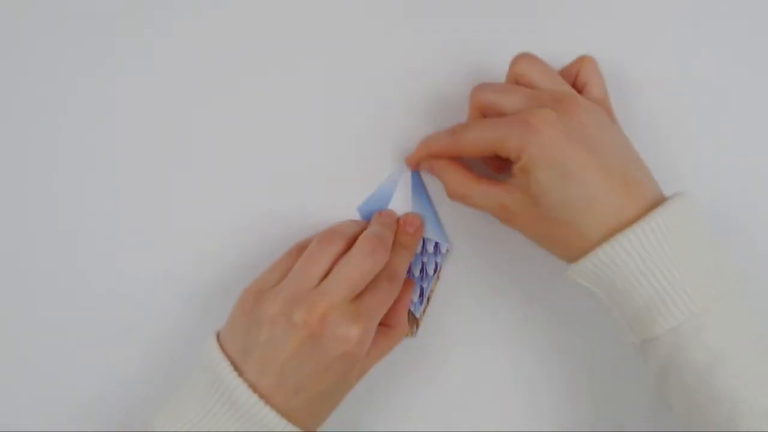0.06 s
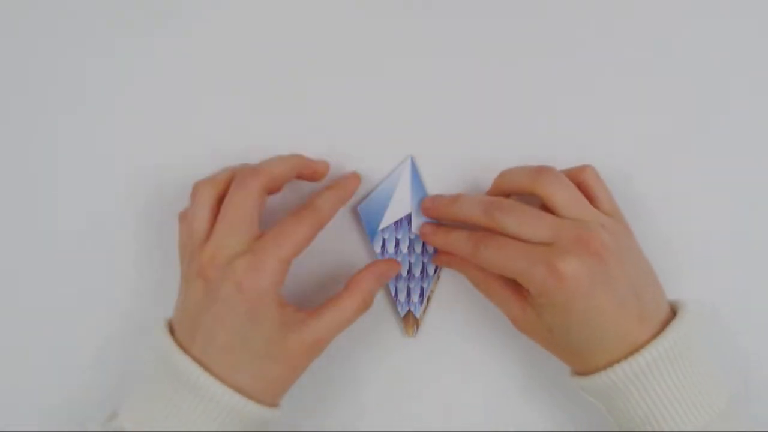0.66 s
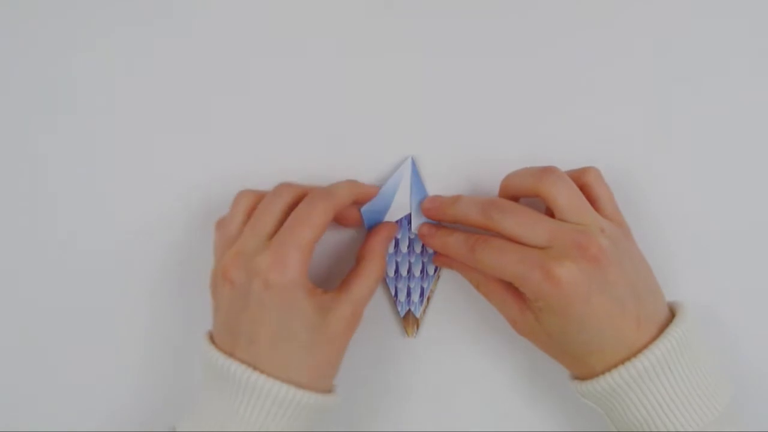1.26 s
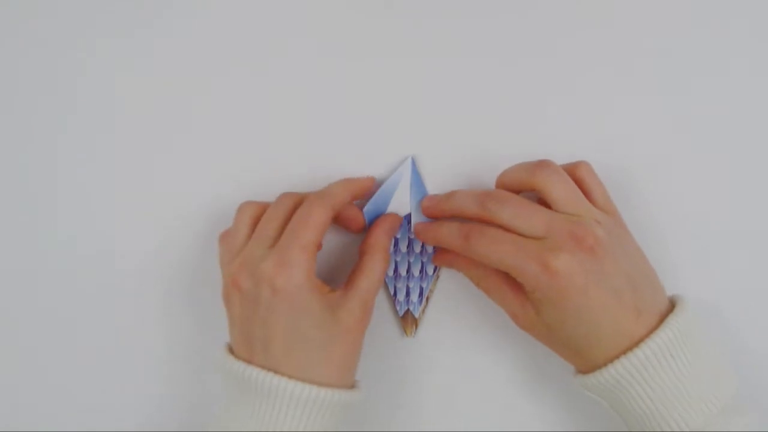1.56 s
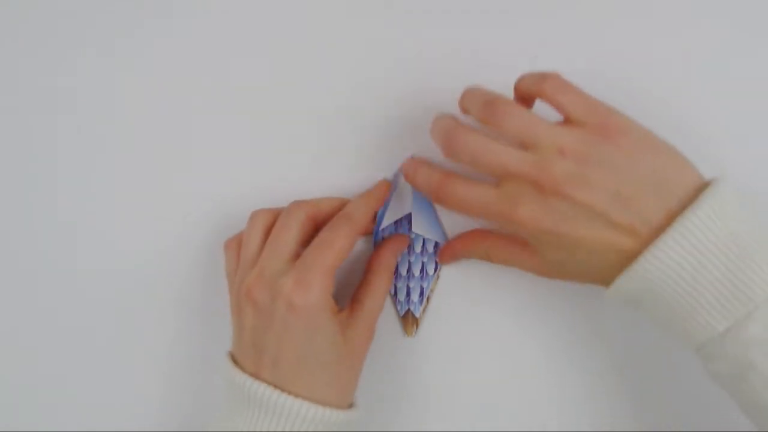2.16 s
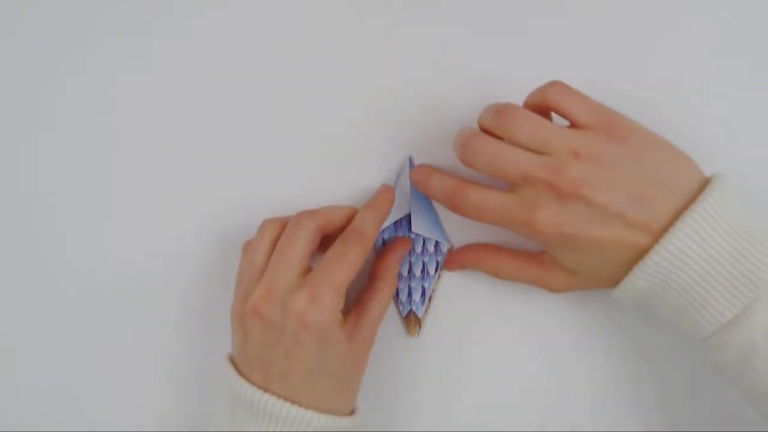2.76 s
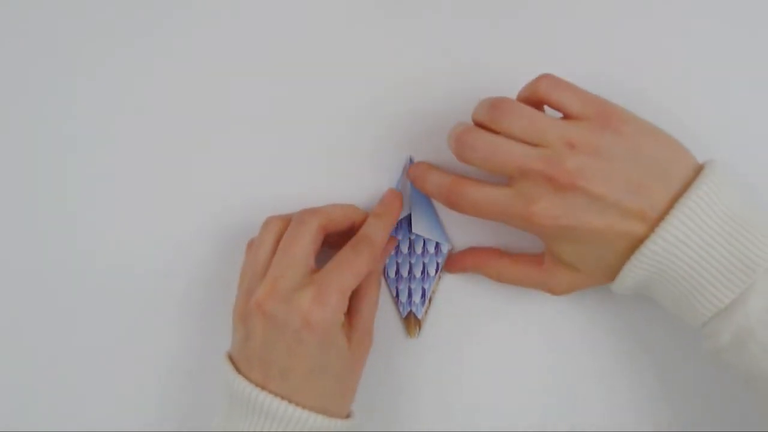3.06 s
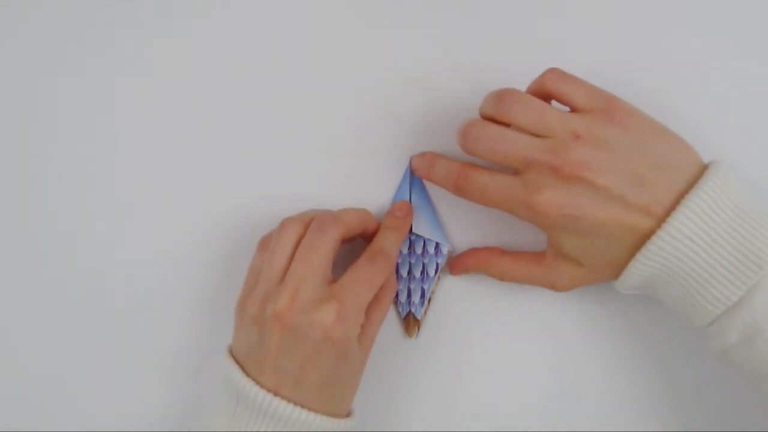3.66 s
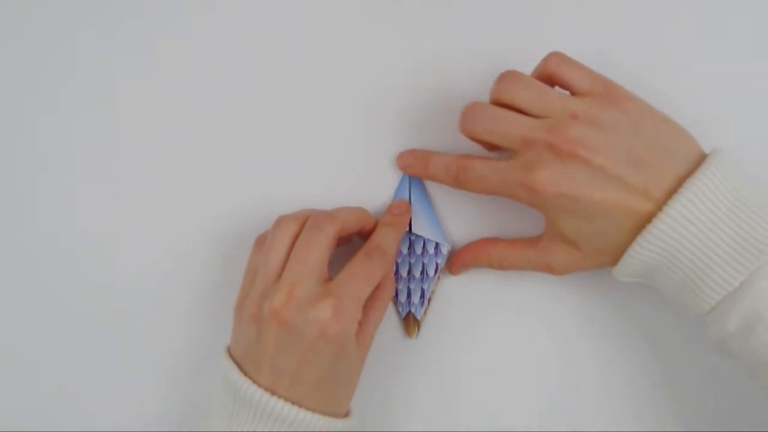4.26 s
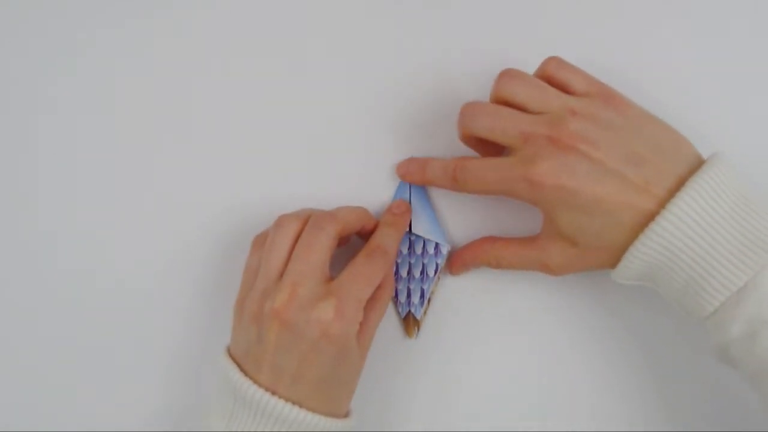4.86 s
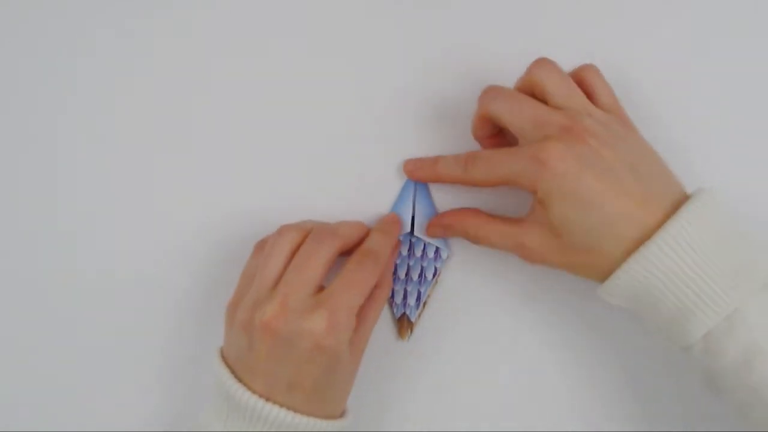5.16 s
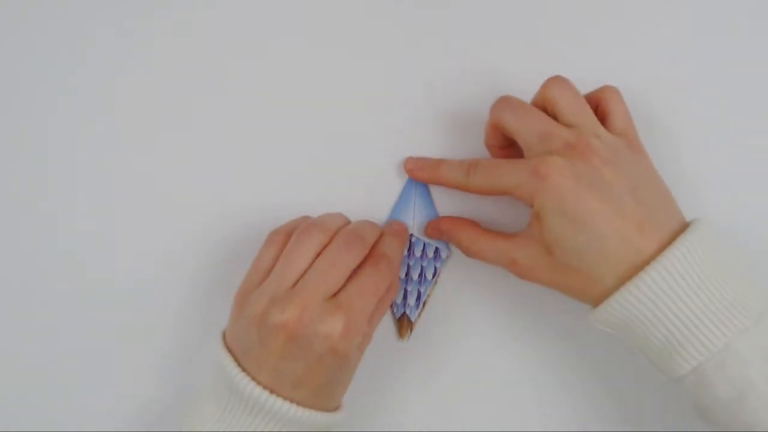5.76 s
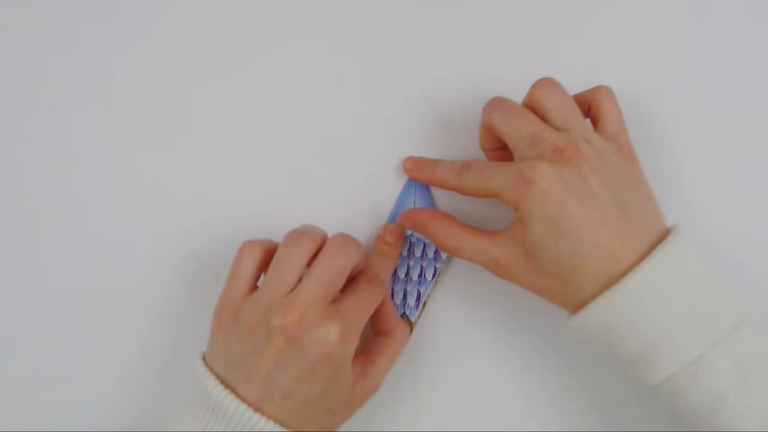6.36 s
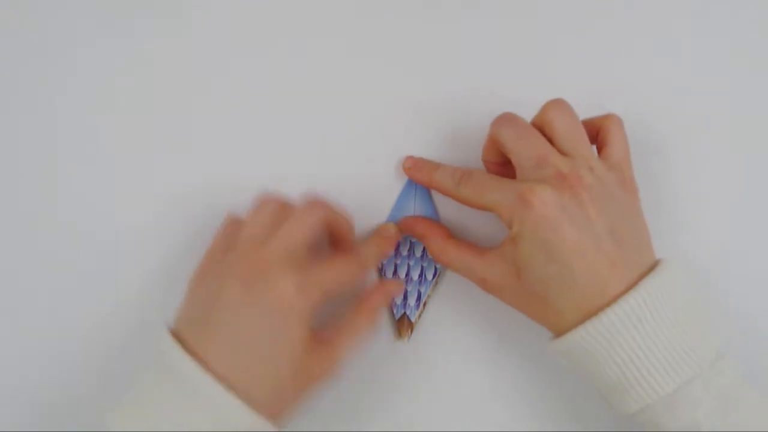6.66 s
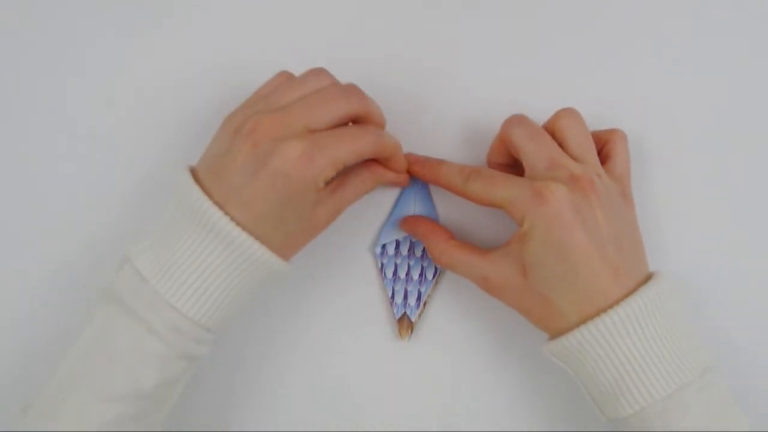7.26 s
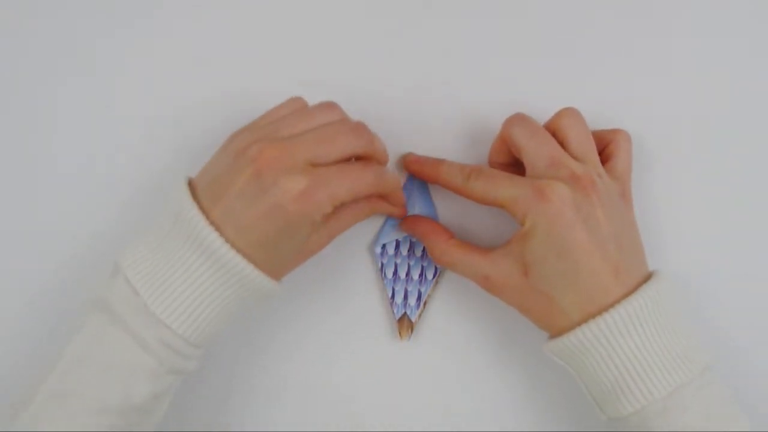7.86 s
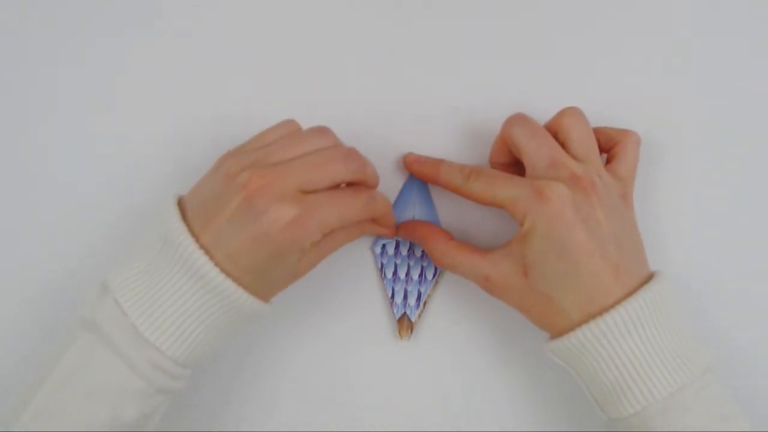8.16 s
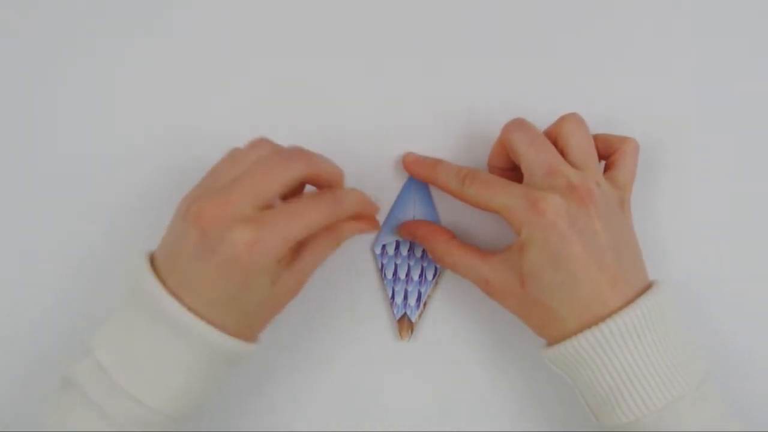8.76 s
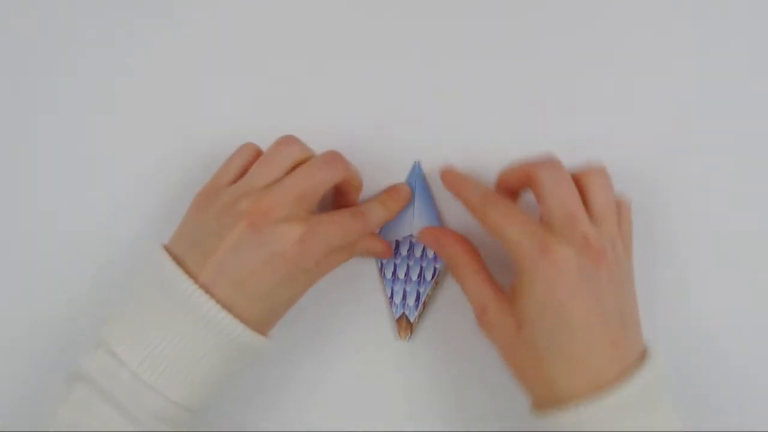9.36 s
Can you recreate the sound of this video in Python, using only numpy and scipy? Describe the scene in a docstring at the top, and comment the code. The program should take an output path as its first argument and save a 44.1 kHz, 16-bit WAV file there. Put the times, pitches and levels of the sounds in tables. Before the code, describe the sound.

Close paper folding in a quiet room: fingertips slide and press, creases crackle and snap, and the tabletop thuds softly.

```python
"""A small paper model folded on a table in a quiet, dry room, one microphone close to the fingers.
It opens with a hard tap and fingertips thumping the tabletop. Skin then slides on paper with a grainy
hiss, folds buckle in crisp crackles and the table rumbles under the hands. At 5.4 s a stiff fold snaps
through loudly; more creasing and thumps follow, then a second snap with a tap at 8.6 s and a few last
strokes. Room tone and a thin electrical whine lie underneath all the way."""
import sys
import numpy as np
from scipy import signal
from scipy.fft import rfft, irfft, next_fast_len
from scipy.io import wavfile

SR = 44100
rng = np.random.default_rng(int(sys.argv[2]) if len(sys.argv) > 2 else 0)


def output_pcm(signal):
    """Save a mono or channel-first signal as 16-bit PCM at the path in sys.argv[1].

    Samples are clipped to [-1, 1] before scaling.
    """
    pcm = np.clip(np.atleast_2d(signal).T, -1, 1) * 32767
    wavfile.write(sys.argv[1], SR, np.round(pcm).astype(np.int16))


N = 414981
TIME = np.arange(N) / SR
CRACK_TIME, CRACK_ONSET = np.arange(1024) / SR, int(.004 * SR)  # a crack's first 4 ms set its level

# Levels in the tables stand before the gains in the functions.
# fingers over paper: t/s, length/s, fastest point/share of length, hiss/dB, body/dB and sheen/dB re hiss
FINGER_STROKES = [(0.0, 0.13, 0.52, -53, -4.5, -12), (0.092, .11, 0.34, -48.5, -2.5, -10),
                  (0.425, 0.092, 0.66, -56.5, -1, -14), (0.494, 0.05, .55, -48, -4.5, -9),
                  (0.538, .075, 0.44, -54.5, -1, -12), (0.57, .2, 0.37, -60, -5, -13),
                  (0.7, 0.41, 0.22, -56, 1, -15), (0.94, .27, 0.69, -52.5, 0, -21),
                  (1.216, 0.05, .3, -49.5, -3, -16), (1.355, 0.044, .3, -50, 5.5, -13),
                  (1.397, 0.12, .4, -60, 0, -16), (1.493, 0.17, .35, -54.5, 2, -17),
                  (1.67, .06, 0.17, -45, -5, -12), (1.728, 0.17, 0.41, -48.5, -5.5, -8),
                  (1.899, 0.12, 0.42, -50.5, -3, -8), (2.1, 0.13, 0.42, -48, -5.5, -8),
                  (2.215, 0.16, 0.62, -52, -3, -6), (2.527, 0.076, .35, -54.5, 0, -12),
                  (2.445, 0.77, .5, -67, 3, -12), (2.925, .13, .55, -54.5, -4, -11),
                  (3.02, .15, .4, -62, -3, -14), (3.087, .028, .5, -54, -5, -14),
                  (3.165, 0.053, .45, -56, -9, -12), (3.277, 0.47, 0.23, -61, 0, -22),
                  (3.695, 0.072, .65, -52.5, -10, -9), (4.35, .035, .2, -53, -7, -8),
                  (4.361, 0.086, .42, -46.5, -6.5, -10), (4.956, 0.16, 0.19, -48.5, -0.5, -13),
                  (5.149, 0.057, .3, -55.5, -1.5, -16), (5.28, 0.15, .5, -59, 3, -15),
                  (6.06, 0.19, 0.51, -55.5, -4, -20), (6.21, 0.042, .45, -52, -1, -14),
                  (6.45, 0.046, .6, -54.5, -2, -15), (6.7, 0.036, .25, -54, -9, -16),
                  (7.153, .08, .35, -50, -5, -21), (7.167, .022, .5, -40.5, -8, -22),
                  (7.33, 0.022, .5, -58, -5, -19), (7.455, 0.037, .4, -55, -4, -22),
                  (7.557, 0.35, 0.57, -61.5, 1.5, -18), (7.703, 0.15, .45, -47.5, -18, -23),
                  (7.86, 0.083, 0.52, -53.5, -3.5, -15), (7.98, .29, 0.42, -58, -1, -12),
                  (8.36, 0.3, 0.5, -65, -1, -10), (8.804, 0.024, .25, -45.5, -20, -2),
                  (8.941, .035, .5, -54.5, -3, -15), (9.205, 0.085, 0.45, -46, -12, -8),
                  (9.314, 0.11, 0.46, -53.5, -2.5, -11)]
# creases rubbed against the table: t/s, length/s, level/dB
CREASE_RUBS = [(0.09, 0.11, -51.5), (1.233, 0.075, -55.5), (1.583, 0.16, -62.5), (4.955, 0.1, -56),
               (5.28, 0.21, -59.5), (8.111, .07, -55.5), (8.308, .14, -52.5), (9.33, .09, -59)]
# friction spectra of the fibres, their top sheen, the sheet's body and a dull rub: f/Hz, level/dB
HISS_SPECTRUM = [(3000, -21.5), (5500, -8.5), (7000, -5.5), (8500, -0.5), (9900, 1), (11000, -6),
                 (12200, -13.5), (16000, -34)]
SHEEN_SPECTRUM = [(8000, -25), (10500, 2), (11800, -4), (13200, -8), (16000, -23)]
BODY_SPECTRUM = [(900, -23), (2150, -6.5), (2800, 0), (4200, -0.5), (5700, -3.5), (7500, -12), (11000, -41)]
RUB_SPECTRUM = [(250, -19), (500, 6), (1100, 1.5), (2000, -4), (4000, -25)]
# folds buckling: t/s, level/dB, flap ring/Hz, decay/s, upper edge/Hz
FOLD_CRACKLES = [(0.1095, -29.5, 3220, .0031, 11600), (0.166, -40.5, 9100, .002, 11600),
                 (0.454, -44.5, 9860, 0.00053, 11600), (1.2054, -47, 3640, .003, 11000),
                 (1.2554, -42.5, 6200, .0028, 11700), (1.366, -45, 3920, .0034, 11600),
                 (1.6149, -37.5, 2400, .0014, 8500), (1.675, -41.5, 4800, .003, 11000),
                 (1.7494, -43, 9950, 0.0035, 12000), (1.9093, -46.5, 5000, .003, 10800),
                 (2.0059, -46, 4080, .0011, 10000), (2.5357, -48, 10420, 0.0042, 12500),
                 (3.0483, -46, 3700, .003, 11400), (3.1, -48, 8700, .003, 11200),
                 (3.4813, -49, 7500, .0022, 12000), (3.528, -48.5, 4200, .0022, 10500),
                 (3.5704, -47, 7500, .002, 11000), (3.683, -47, 3500, 0.0019, 7460),
                 (3.812, -40.5, 9300, 0.0013, 11000), (3.924, -54, 2800, 0.0017, 10000),
                 (4.6714, -38, 8200, 0.0013, 11700), (4.9117, -47.5, 3300, .001, 12000),
                 (4.9757, -44.5, 8000, .0033, 11600), (5.286, -45, 5210, .0016, 12200),
                 (5.333, -44, 7150, .002, 11000), (5.3646, -42.5, 6000, .002, 10500),
                 (5.462, -40.5, 2670, 0.0016, 12400), (5.4787, -49, 3140, .0005, 10000),
                 (5.7775, -45, 2200, 0.0014, 9500), (5.8691, -38, 2200, 0.0014, 11000),
                 (6.485, -45.5, 3850, 0.0016, 10500), (6.6435, -52, 8790, 0.004, 11000),
                 (6.708, -49.5, 9860, 0.0042, 11400), (6.955, -38, 8160, 0.0011, 10700),
                 (7.1305, -43, 3100, 0.0022, 9800), (7.177, -37, 8300, .0045, 9800),
                 (7.4588, -48, 2970, 0.0016, 10500), (7.5301, -46.5, 3200, .0012, 11400),
                 (7.9158, -41.5, 7100, .0015, 11300), (8.137, -50, 2210, 0.0025, 11600),
                 (8.3778, -44.5, 3300, .0022, 12400), (8.807, -42.5, 3830, 0.0025, 13000),
                 (9.2485, -41, 10000, .003, 11600)]
# flurries from a squeezed crease: t/s, length/s, level/dB
CRINKLE_FLURRIES = [(3.371, .1, -56.5), (5.298, .06, -48.5), (8.31, .07, -51)]
# stiff folds snapping: t/s, level/dB, ring/Hz, width/Hz, rebound delay/s, rebound/share, tilt/(dB/octave)
FOLD_SNAPS = [(5.39, -16.5, 3540, 1300, 0.00029, 0.32, 4.0), (8.6007, -17, 4130, 1400, 0.00062, 0.3, 1)]
# short resonances of the paper model: f/Hz, width/Hz, level/dB
PAPER_MODES = [(1940, 520, -36), (3000, 1600, -12), (5600, 1000, -6.5), (7650, 1900, -9), (9200, 720, -16)]

# a nail or paper edge on the table: t/s, level/dB, tilt/(dB/octave), hollow knock/dB
HARD_TAPS = [(0.1083, -33, -1.7, -49), (8.5995, -30, -0.5, -35), (9.214, -54, -6, -45)]
# fingertips landing: t/s, level/dB, contact/s, tilt/(dB/octave)
FINGER_THUMPS = [(0.111, -35, 0.0036, 2), (0.124, -39, 0.0043, 8), (0.165, -35, .007, -1),
                 (5.332, -46, 0.0055, 8), (5.364, -41.5, 0.0054, 6), (7.137, -37, 0.0074, 0),
                 (7.177, -31, 0.0065, -6), (7.456, -40, 0.0044, -1), (8.601, -44, 0.0024, -5),
                 (8.814, -38.5, 0.0075, -5), (9.214, -45, 0.0036, 1.5)]
# hands bearing down: t/s, held/s, rumble/dB, boom/dB
HAND_PRESSES = [(0.0, .04, -61, -50), (0.48, 0.047, -53, -49), (1.53, 0.084, -53.5, -46.5),
                (1.68, 0.043, -50, -50), (1.93, 0.068, -52.5, -50), (2.11, 0.18, -57, -53),
                (2.35, .14, -60.5, -58), (3.03, 0.045, -51, -51), (3.39, 0.14, -52, -45),
                (4.35, 0.036, -56.5, -52), (4.91, 0.052, -54, -55), (4.98, 0.065, -50.5, -45),
                (5.29, 0.11, -50, -53), (5.44, 0.093, -53, -46.5), (6.03, 0.045, -50, -48),
                (6.15, .04, -50, -45), (6.48, .05, -54, -50), (6.69, 0.1, -58, -45),
                (7.13, 0.097, -50, -42), (7.44, 0.049, -49, -42.5), (7.84, 0.16, -60.5, -43.5),
                (8.32, 0.084, -49, -51), (8.82, 0.052, -53.5, -56), (8.99, .12, -60, -53),
                (9.21, .04, -43.5, -47), (9.32, 0.076, -52, -44)]
# the table stirring under resting hands: t/s, level/dB
RESTING_HANDS = [(0.0, -52), (0.23, -48), (0.76, -73), (1.42, -61), (3.51, -54), (4.27, -71), (5.5, -51),
                 (5.87, -61.5), (7.21, -53.5), (7.36, -50.5), (7.57, -55.5), (9.41, -51)]
# deep and higher modes of the tabletop: f/Hz, level/dB, t60/s
DEEP_TABLE_MODES = [(56.95, 1, 0.67), (88, -12.5, 0.27), (133, -4.5, 0.23), (178.2, -5.5, 0.36),
                    (255, -12, 0.13)]
HIGH_TABLE_MODES = [(312, -11, 0.37), (338, -0.5, 0.28), (467, -9, 0.12), (558, -3, 0.19),
                    (1140, -12, 0.18), (1440, -30, .2), (1550, -22, 0.17), (2380, -15, 0.18)]
# spectra of the table's clatter, rumble and deep boom: f/Hz, level/dB
CLATTER_SPECTRUM = [(150, -6.5), (330, 0.5), (800, -3.5), (1400, 6.5), (1800, 0.5), (2450, 7.5),
                    (3300, -3.5), (4300, -1.5), (6500, -31), (9500, -11), (12000, -19), (16000, -38)]
RUMBLE_SPECTRUM = [(55, -18), (87, 0.5), (108, -8.5), (133, 4), (157, -5), (181, -0.5), (210, -10.5),
                   (335, -10), (450, -15.5), (900, -42)]
BOOM_SPECTRUM = [(25, -38), (44, -14), (52, 18.5), (57, 23), (67, 2), (100, -54)]

# spectrum of the room tone: f/Hz, level/dB
ROOM_SPECTRUM = [(44, -46), (75, -6), (137, -8.5), (157, -7), (377, -11), (505, -16), (905, -17.5),
                 (1550, -19.5), (1740, -22.5), (2080, -20.5), (3040, -23.5), (6980, -29), (7980, -23.5),
                 (8540, -28), (16000, -41)]
# steady bands of low drone and electrical whine: f/Hz, width/Hz, level/dB
DRONE_AND_WHINE = [(24, 19, -62), (54.3, 21, -64.5), (7870, 11, -75), (7900, 200, -71.5),
                   (9220, 250, -76.5)]


def sliding(hiss_db=-1.6, sheen_db=1.0, body_db=-0.4, rub_db=0.4):
    """Close up, skin catches and slips on paper: fibres hiss, the sheet adds body, creases rub dully."""
    hiss_power, body_power, sheen_power = np.zeros((3, N))
    for s, length, crest, db, body_rel_db, sheen_rel_db in FINGER_STROKES:
        friction = undb(db) * stroke(s, length, crest)
        hiss_power += friction ** 2
        body_power += (friction * undb(body_rel_db)) ** 2
        sheen_power += (friction * undb(sheen_rel_db)) ** 2
    rub = sum(undb(db) * stroke(s, length, crest=0.48) for s, length, db in CREASE_RUBS)
    grip_db = 1.8 * walk(per_s=120) + 0.65 * walk(per_s=35)
    out = fibres(HISS_SPECTRUM, per_s=14000, spread_db=0.5) * np.sqrt(hiss_power) * undb(hiss_db)
    out += fibres(SHEEN_SPECTRUM, per_s=7500, spread_db=1.0) * np.sqrt(sheen_power) * undb(sheen_db)
    out += fibres(BODY_SPECTRUM, per_s=9000, spread_db=-0.1) * np.sqrt(body_power) * undb(body_db)
    out += fibres(RUB_SPECTRUM, per_s=3000, spread_db=2.0) * rub * undb(rub_db)
    return out * undb(grip_db)


def stroke(s, length, crest, speed_exponent=0.73):
    """Loudness of one stroke: the finger speeds up to a crest and slows to rest."""
    ramp = np.interp(TIME, [s, s + crest * length, s + length], [0, 1, 0])
    speed = np.sin(np.pi / 2 * np.maximum(ramp, 0))
    return speed ** speed_exponent


def fibres(spectrum, per_s, spread_db):
    """Dense tiny slips of paper fibres, uneven in size, merge into a grainy noise."""
    slips = (rng.random(N) < per_s / SR) * rng.standard_normal(N)
    size_db = spread_db * np.minimum(rng.exponential(size=N), 5)
    return stream(slips * undb(size_db), spectrum)


def crackles(flap_db=6, flap_width=0.28, bands_db=(-1, 0, 1.1), tick_db=-17, fall_db_per_octave=4.5):
    """A fold buckles with a jolt, shivers and rings its flap; the crack weakens away from that pitch."""
    out = np.zeros(N)
    noises = rng.standard_normal((128, len(CRACK_TIME)))
    for (s, db, hz, decay, top_hz), noise in zip(FOLD_CRACKLES + crinkles(), noises):
        start = s - .0002
        shiver = noise * np.exp(-CRACK_TIME / decay)
        shiver[0] += 5.0  # the jolt
        flap = shiver + undb(flap_db) * resonate(shiver, hz, flap_width * hz)
        # the jolt itself gives the crack a thin crisp edge
        tick = signal.lfilter(*signal.butter(2, max(top_hz, 11000), "highpass", fs=SR), shiver)
        add_crack(out, start, tick, db + tick_db - fall_db_per_octave * np.log2(top_hz / hz))
        for edges_hz, band_db in zip([(1100, 2800), (2800, 6500), (6500, top_hz)], bands_db):
            octaves_off = abs(np.log2(hz / np.mean(edges_hz)))
            band = signal.lfilter(*signal.butter(3, edges_hz, "bandpass", fs=SR), flap)
            add_crack(out, start, band, db + band_db - fall_db_per_octave * octaves_off)
    return out


def crinkles(per_s=70, ring_hz=8100, decay_s=.0017, spread_db=0.5, top_hz=11200):
    """A squeezed crease gives way in tiny, unevenly spaced crackles: rows like FOLD_CRACKLES."""
    rows = []
    for s, length, db in CRINKLE_FLURRIES:
        for k, (late, size, pitch) in enumerate(rng.uniform(-0.75, 1, (16, 3))):
            delay = (k + .5 + late / 2) / per_s
            if delay < length:
                rows.append((s + delay, db + spread_db * size, ring_hz * 2 ** (pitch / 2), decay_s, top_hz))
    return rows


def snaps(shiver_share=0.2, shiver_s=0.00094, low_hz=1500, high_hz=10500):
    """A stiff fold flips over all at once, rebounds, and rings the whole model for a moment."""
    out = np.zeros(N)
    low_cut = signal.butter(2, low_hz, "highpass", fs=SR, output="sos")
    high_cut = signal.butter(4, high_hz, fs=SR, output="sos")
    radiation = np.vstack([low_cut, high_cut])
    for s, db, hz, width_hz, delay, rebound, tilt_db in FOLD_SNAPS:
        jolt = shiver_share * rng.standard_normal(len(CRACK_TIME)) * np.exp(-CRACK_TIME / shiver_s)
        jolt[0] += 1
        jolt[int(delay * SR)] += rebound
        modes = [(hz, width_hz, 0), *PAPER_MODES]
        crack = sum(undb(level + tilt_db * np.log2(f / hz)) * resonate(jolt, f, width)
                    for f, width, level in modes)
        add_crack(out, s, signal.sosfilt(radiation, crack), db)
    return out


def taps(t60=0.27):
    """A hard tap sets off the higher table modes and a dense clatter that fades fast."""
    out, t = np.zeros(N), np.arange(SR // 2) / SR
    for s, db, tilt_db, knock_db in HARD_TAPS:
        spectrum = [(hz, level + tilt_db * np.log2(hz / 2000)) for hz, level in CLATTER_SPECTRUM]
        clatter = colour(rng.standard_normal(len(t)), spectrum) * fade(t, t60)
        add(out, s, undb(db) * clatter + undb(knock_db) * ring(HIGH_TABLE_MODES, t))
    return out


def thumps():
    """A landing fingertip rings the deep table modes, duller for a longer contact."""
    out, t = np.zeros(N), np.arange(SR) / SR
    lowest_hz = DEEP_TABLE_MODES[0][0]
    for s, db, contact, tilt_db in FINGER_THUMPS:
        # where the finger lands decides how strongly the higher modes answer
        modes = [(hz, level + tilt_db * np.log2(hz / lowest_hz), t60)
                 for hz, level, t60 in DEEP_TABLE_MODES]
        push = np.hanning(int(contact * SR) + 3)
        add(out, s, undb(db) * signal.fftconvolve(ring(modes, t), push / push.sum()))
    return out


def table_rumble(rest_rumble_db=-6.5, rest_boom_db=1.5, boom_lag_s=0.016):
    """Shifting hands keep the table rumbling; its deep boom builds up late and rings on."""
    resting_db = np.interp(TIME, *np.transpose(RESTING_HANDS))
    rumble, boom = undb(resting_db + rest_rumble_db), undb(resting_db + rest_boom_db)
    for s, held, rumble_db, boom_db in HAND_PRESSES:
        weight = press(s, held, attack_s=0.018, release_s=0.055)
        swell = press(s + boom_lag_s, held, attack_s=0.031, release_s=.09)
        rumble = np.maximum(rumble, undb(rumble_db) * weight)
        boom = np.maximum(boom, undb(boom_db) * swell)
    out = stream(rng.standard_normal(N), RUMBLE_SPECTRUM) * rumble
    return out + stream(rng.standard_normal(N), BOOM_SPECTRUM) * boom


def press(s, held, attack_s, release_s):
    """Loudness of one press: the weight comes on, is held and dies away."""
    t = np.maximum(TIME - s, 0)
    return np.minimum(t / attack_s, 1) * np.exp(-np.clip((t - held) / release_s, 0, 20))


def holding(hiss_db=-71, body_db=-69, rub_db=-63, fidget_db=1.2):
    """Fingers that only hold the model still creep on it and keep up a faint rustle."""
    layers = [(HISS_SPECTRUM, hiss_db), (BODY_SPECTRUM, body_db), (RUB_SPECTRUM, rub_db)]
    rustle = sum(undb(db) * fibres(spectrum, per_s=4000, spread_db=1.65) for spectrum, db in layers)
    return rustle * undb(fidget_db * walk(per_s=14))


def room(x, wet_db=-12, t60=0.27, treble_t60=0.12, split_hz=5000, build_s=0.0041):
    """A small furnished room from close in: direct sound, then a short tail whose treble dies first."""
    t = np.arange(SR // 2) / SR
    noise = rng.standard_normal(len(t))
    low = signal.sosfilt(signal.butter(1, split_hz, fs=SR, output="sos"), noise)
    tail = low * fade(t, t60) + 0.98 * (noise - low) * fade(t, treble_t60)
    tail *= np.minimum(t / build_s, 1)
    return x + undb(wet_db) * signal.fftconvolve(x, tail / np.linalg.norm(tail))[:N]


def room_tone(noise_db=-56):
    """Behind the hands, steady room noise with a low drone and a thin electrical whine."""
    out = stream(rng.standard_normal(N), ROOM_SPECTRUM) * undb(noise_db)
    for hz, width_hz, db in DRONE_AND_WHINE:
        band = resonate(rng.standard_normal(N), hz, width_hz)
        out += undb(db) * unit(resonate(band, hz, width_hz))
    return out


def undb(db):
    """Decibels to gain."""
    return 10 ** (np.asarray(db) / 20)


def unit(x):
    """Scale to rms 1."""
    return x / np.sqrt(np.mean(x ** 2))


def add(out, s, sound):
    """Mix a sound in at time s."""
    start = int(s * SR)
    out[start:start + len(sound)] += sound[:N - start]


def add_crack(out, s, crack, db):
    """Mix a crack in at time s with its onset at level db."""
    add(out, s, crack * undb(db) / np.std(crack[:CRACK_ONSET]))


def colour(x, spectrum):
    """Give a sound a smooth spectrum, rolled off below its first point, at rms 1."""
    hz, db = np.transpose(spectrum)
    f = np.maximum(np.fft.rfftfreq(len(x), 1 / SR), 1)
    gain = undb(np.interp(np.log(f), np.log(hz), db))
    low_cut = np.minimum(f / hz[0], 1) ** 2
    return unit(irfft(rfft(x) * gain * low_cut, len(x)))


def stream(x, spectrum):
    """Colour a full-length sound, at rms 1."""
    padded = np.pad(x, (0, next_fast_len(N, True) - N))
    return unit(colour(padded, spectrum)[:N])


def resonate(x, hz, width_hz):
    """One resonance, gain 1 at its centre."""
    return signal.lfilter(*signal.iirpeak(hz, hz / width_hz, fs=SR), x)


def walk(per_s):
    """A random wander with a spread near 1."""
    knots = rng.standard_normal(int(N / SR * per_s) + 2)
    return np.interp(TIME * per_s, np.arange(len(knots)), knots)


def fade(t, t60):
    """Decay by 60 dB in t60 seconds."""
    return np.exp(-np.log(1000) * t / t60)


def ring(modes, t):
    """Free ringing of a set of modes."""
    return sum(undb(db) * np.sin(2 * np.pi * hz * t) * fade(t, t60) for hz, db, t60 in modes)


def scene():
    """One close microphone: the paper with a little room around it, the table dry, room tone behind."""
    paper = sliding() + holding() + crackles() + snaps()
    return (room(paper) + taps() + table_rumble() + thumps() + room_tone())[None]


def record(dry):
    """The recorder cuts the top steeply above 16.1 kHz."""
    return signal.sosfilt(signal.ellip(8, .2, 70, 16100, fs=SR, output="sos"), dry)


dry = scene()
out = record(dry)
output_pcm(out)
```